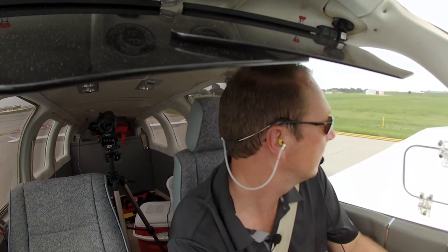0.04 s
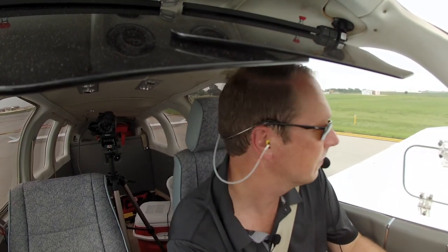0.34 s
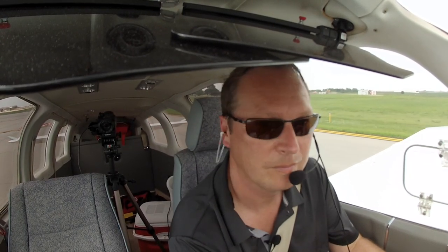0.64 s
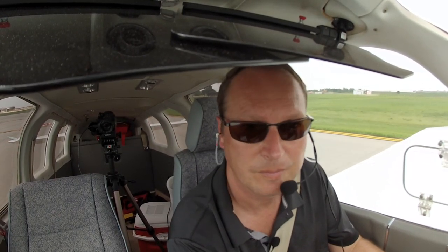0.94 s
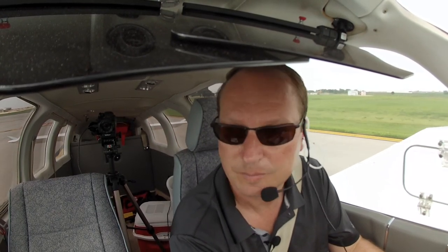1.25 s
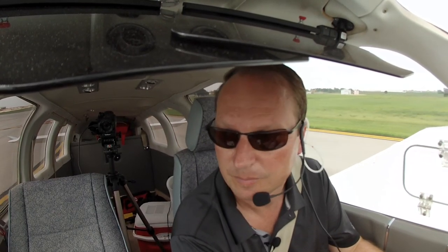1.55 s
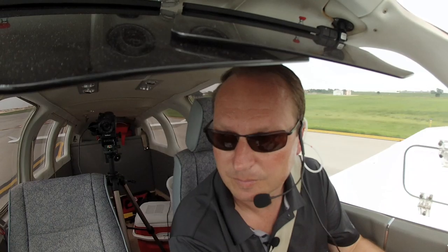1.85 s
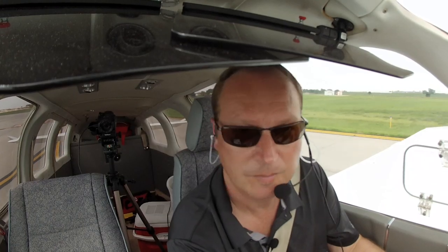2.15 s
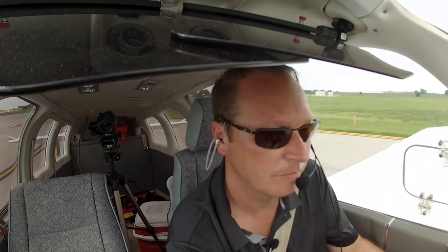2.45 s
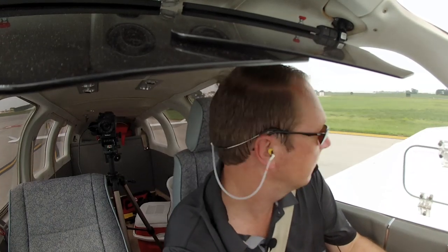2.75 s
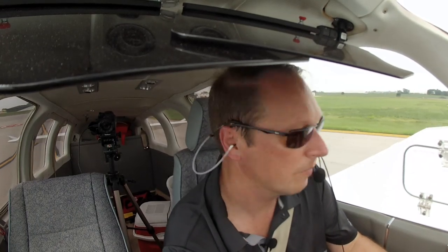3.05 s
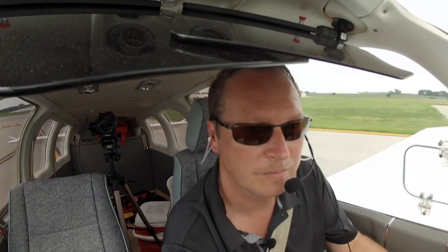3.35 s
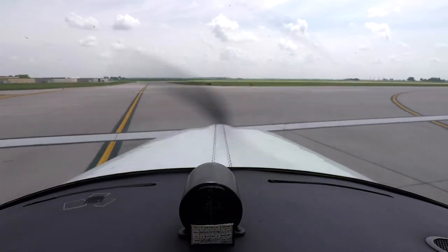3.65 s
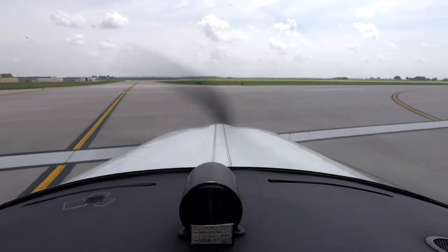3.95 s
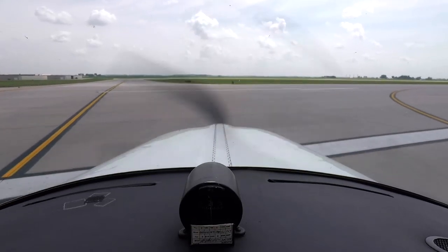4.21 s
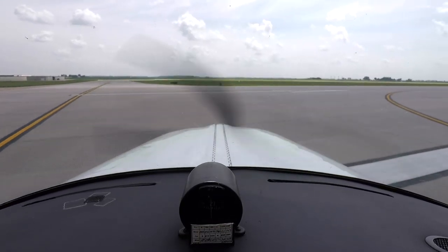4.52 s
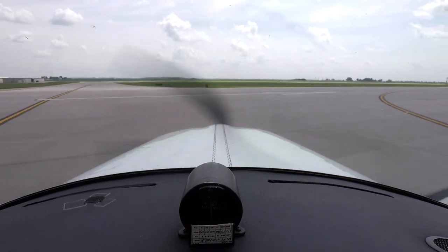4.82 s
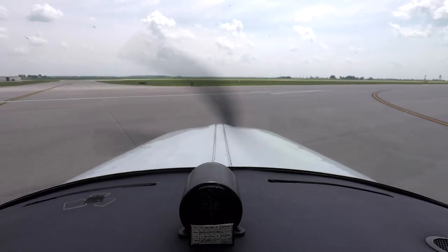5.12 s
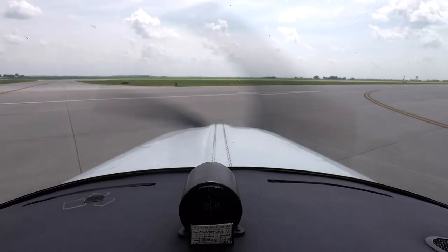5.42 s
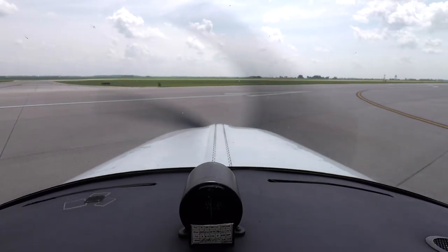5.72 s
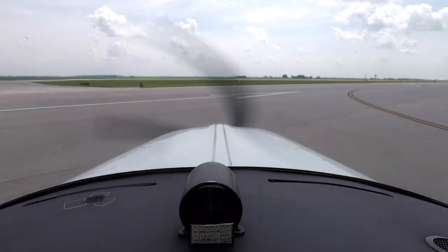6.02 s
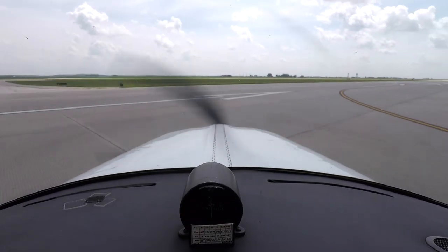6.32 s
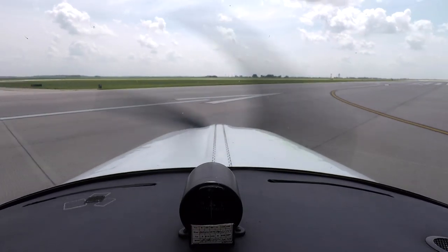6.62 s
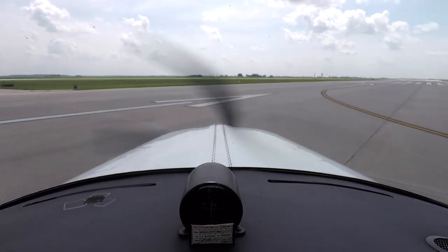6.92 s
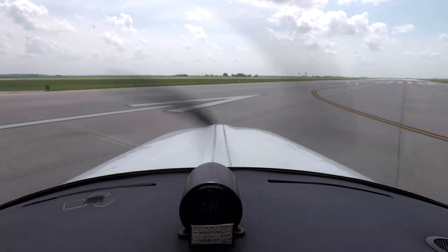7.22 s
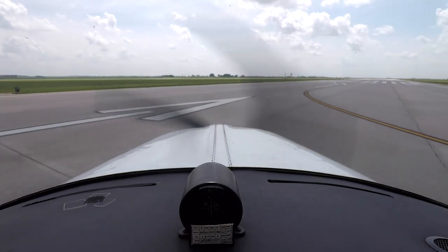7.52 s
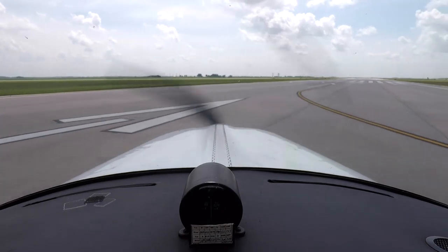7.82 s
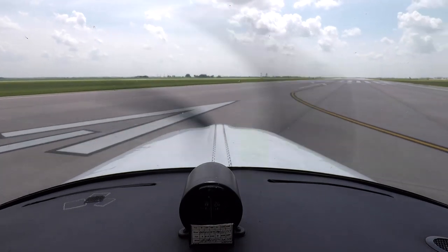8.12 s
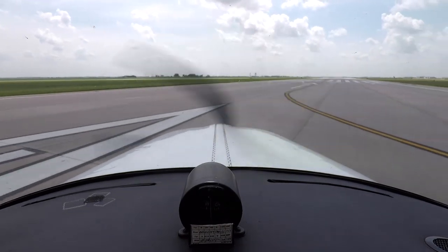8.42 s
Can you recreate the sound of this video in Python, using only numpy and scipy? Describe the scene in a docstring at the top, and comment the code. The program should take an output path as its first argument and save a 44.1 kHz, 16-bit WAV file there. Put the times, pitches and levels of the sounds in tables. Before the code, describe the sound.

A low piston engine drone fills the cabin of a small taxiing plane from the start, heard close, with airframe rumble and throbbing propeller wash. Its pitch creeps upward until about 4.5 seconds. Around 5 seconds it sinks to a lower, slightly softer, lumpy idle, while the deep rumble swells to a peak near 6.3 seconds. From about 7.5 seconds the engine picks up again, its hum swelling near 8 seconds and still rising in pitch at the end, around 8.5 seconds. A thin alternator whine follows the engine speed, above a faint air hiss and a very faint, steady electrical buzz. Throughout, a loose fitting chatters in light, irregular, ringing ticks, several a second, among tiny chirps and dry crackles. Short dull knocks sound in the cabin panels, a little stronger around 3.2, 3.6 and 7.6 seconds.

```python
"""An engine drone, heard in the cabin of a taxiing six-cylinder piston aircraft.
It sinks to a lumpy idle after five seconds, then picks up; a thin alternator whine follows the crank.
The airframe rumbles, propeller wash and exhaust beat on the cabin, the panel electrics sing faintly.
A loose fitting chatters and jolts thud in the panels, among small chirps and dry crackles."""
import sys
import numpy as np
from scipy import signal
from scipy.fft import rfft, irfft
from scipy.io import wavfile
from scipy.ndimage import uniform_filter1d

SR = 44100
rng = np.random.default_rng(int(sys.argv[2]) if len(sys.argv) > 2 else 0)


def dump_mix(stems):
    """Bounce the given channels to the path in sys.argv[1] as a 16-bit WAV at rate SR."""
    frames = np.atleast_2d(stems).T  # one column per channel
    limited = np.clip(frames, -1, 1)  # hard clip at full scale
    pcm = np.round(limited * 32767).astype(np.int16)
    wavfile.write(sys.argv[1], SR, pcm)


N = 373086
TIME = np.arange(N) / SR
HZ = np.fft.rfftfreq(N, 1 / SR)
FIRINGS_PER_TURN = 3
# brief level changes of wash and boom, mostly dips: t/s, change/dB
LULLS = [(.48, -4), (1.0, -8), (2.25, -2), (3.95, -4), (4.47, -7), (4.68, -7), (5.09, -3), (5.32, -6),
         (6.02, -11.5), (6.2, 2.5), (6.38, -11), (6.76, -4.5), (7.25, -6.5), (7.41, -13), (7.72, -3),
         (8.16, -9.5)]


def amp(db):
    """Decibels to gain."""
    return 10 ** (np.asarray(db) / 20)


def unit(x):
    """Scales to unit rms."""
    return x / np.sqrt(np.mean(x ** 2) + 1e-20)


def add(mix, s, sound):
    """Mixes a sound in at time s."""
    part = mix[max(round(s * SR), 0):][:len(sound)]
    part += sound[:len(part)]


def curve(table):
    """A (t/s, value) table at every sample."""
    return np.interp(TIME, *np.transpose(table))


def bumps(table, width_s):
    """One Gaussian per (t/s, height) row."""
    return sum(height * np.exp(-((TIME - s) / width_s) ** 2) for s, height in table)


def colour(x, spectrum):
    """Filters x by a (f/Hz, gain/dB) table; unit rms."""
    hz, db = np.transpose(spectrum)
    gain = amp(np.interp(np.log(HZ + 1), np.log(hz), db))
    return unit(irfft(rfft(x) * gain, N))


def drift(rate_hz):
    """Smooth random signal, about rate_hz new values a second; unit rms."""
    knots = rng.standard_normal(4000)
    count = int(np.clip(rate_hz * N / SR, 2, 3990)) + 2
    smooth = signal.resample_poly(knots[:count], up=8, down=1)
    return unit(np.interp(np.linspace(0, len(smooth) - 1, N), np.arange(len(smooth)), smooth))


def throttle_closure(crank_hz):
    """0 under power, 1 at idle; the throttle leads the crank's inertia."""
    lag_s, power_hz, span_hz = .19, 21.51, 1.86
    demand_hz = crank_hz + lag_s * uniform_filter1d(np.gradient(crank_hz) * SR, SR // 4)
    return np.clip((power_hz - demand_hz) / span_hz, 0, 1)


def cabin_gain(hz):
    """Cabin resonances lift whatever passes through them."""
    modes = [(225.3, 6.2, 12), (299.6, 7.3, 8.5), (456, 144, 13)]  # f/Hz, width/Hz, lift/dB
    return 1 + sum((amp(db) - 1) / (1 + (2 * (hz - centre) / width) ** 2) for centre, width, db in modes)


def engine_drone(turns, crank_hz, idle):
    """Three firings a turn give the main tone; unequal cylinders fill in the half orders."""
    octave = [(0, -26.5), (.3, -26.5), (.5, -30.5), (1.1, -29.5), (1.35, -26.5), (1.8, -29.5),
              (2.85, -28.5), (3.1, -37), (4.7, -34), (5.5, -39.5), (7.2, -38), (7.6, -31.5), (7.88, -21.5),
              (8.2, -33.5), (8.46, -30)]  # firing tone's octave: t/s, level/dB
    bed = [(1, -36), (5.5, -48), (9.5, -57), (12.5, -63), (17, -63), (21, -62.5), (26, -66), (31, -65.5),
           (36, -71.5), (41, -68)]  # weak orders: crank multiple, level/dB
    orders = [(1, -43, -37), (1.5, -41, -38), (2, -35.5, -36), (3.5, -41, -45), (4, -41, -39),
              (4.5, -39.5, -32.5), (5, -40, -50), (6.5, -47, -52), (7, -50, -46), (7.5, -41.5, -40.5),
              (8, -45.5, -53), (9, -46, -43), (10, -42.5, -37.5), (10.5, -42, -47), (11, -55, -45),
              (11.5, -47, -47), (12, -62, -45), (13, -53, -62), (13.5, -49.5, -49.5), (14, -56, -56),
              (14.5, -59, -52), (15, -55, -60), (16, -56, -68), (16.5, -57, -61), (19, -58, -66),
              (20.5, -51.5, -65), (21.5, -56.5, -66), (22.5, -56.5, -66), (23.5, -63, -59),
              (28.5, -57.5, -63), (30, -58, -67), (33, -59, -68), (41, -64, -65)]  # strong orders: crank multiple, power level/dB, idle level/dB
    taxi_hz, firing_db_per_hz, scatter_db = 23.6, .47, 3.5

    def tone(order, flutter):
        """One crank order; the burns vary more at idle."""
        unevenness = 1 + flutter * (1 + 3 * idle) * drift(9)
        return unevenness * np.sqrt(2) * np.sin(2 * np.pi * (order * turns + rng.random()))

    firing_db = -23.5 + firing_db_per_hz * (crank_hz - taxi_hz) - 3.5 * idle
    out = amp(firing_db) * tone(FIRINGS_PER_TURN, flutter=.03)
    out += amp(curve(octave)) * tone(2 * FIRINGS_PER_TURN, flutter=.08)
    strong = {order: levels for order, *levels in orders}
    for order in np.setdiff1d(np.arange(1, 42, .5), [FIRINGS_PER_TURN, 2 * FIRINGS_PER_TURN]):
        bed_db = np.interp(order, *np.transpose(bed)) + scatter_db * rng.standard_normal()
        power_db, idle_db = strong.get(order, (bed_db, bed_db - 3))
        gain = amp(power_db + (idle_db - power_db) * idle) * unit(cabin_gain(order * crank_hz))
        out += gain * tone(order, flutter=.09)
    return out


def airframe(idle, chug):
    """Wheels and engine mounts shake the cabin, which booms more at idle."""
    shake = [(0, -42), (.7, -38.5), (1.4, -39), (2.6, -33.5), (3.5, -34.5), (4.9, -30), (6.3, -24.5),
             (7.1, -32), (8.46, -36)]  # rumble envelope: t/s, relative level/dB
    rumble_spectrum = [(5, -21), (14, -5), (25, -6), (40, 17.5), (52, 11.5), (70, 7), (110, -34),
                       (300, -80)]  # f/Hz, gain/dB
    boom_spectrum = [(6, -21), (20, 1.5), (30, 9.5), (60, -7.5), (85, 7.5), (115, 4.5), (150, -1),
                     (190, -5), (240, -8), (280, -17), (500, -52), (2000, -80)]  # f/Hz, gain/dB
    rumble = amp(curve(shake) + 2) * colour(rng.standard_normal(N), rumble_spectrum)
    boom = colour(rng.standard_normal(N), boom_spectrum)
    boom = unit(irfft(rfft(boom) * cabin_gain(HZ) ** .19, N))
    boom_db = -27 + 2.5 * idle + 2 * chug + 1.25 * drift(7.8) + bumps(LULLS, width_s=.049)
    return rumble + amp(boom_db) * boom


def alternator_whine(turns, crank_hz):
    """Belted to the crank: trembles with the belt, brightens with speed."""
    harmonics = [-61.5, -65, -76]  # from the fundamental up, at top speed: level/dB
    cycles_per_turn, tilt_db_per_hz = 72, 1.1
    slip_turns = .0023 * drift(42)
    swell = amp(1.6 * drift(22))
    tilt_db = tilt_db_per_hz * (crank_hz - crank_hz.max())
    phase = 2 * np.pi * cycles_per_turn * (turns + slip_turns)
    return swell * sum(amp(db + (k - 1) * tilt_db) * np.sin(k * phase) for k, db in enumerate(harmonics, 1))


def exhaust_puffs(turns, idle):
    """Gain with one decaying puff per firing; strengths scatter more at idle."""
    decay_db, scatter_db = 3.5, 1.2 + .6 * idle
    firing, fraction = np.divmod(abs(turns) * FIRINGS_PER_TURN, 1)
    strength = rng.standard_normal(1000)[firing.astype(int)]
    return uniform_filter1d(amp(scatter_db * strength - decay_db * fraction), size=60)


def propeller_wash(turns, idle, chug):
    """Wash and exhaust beat on the cabin, throbbing with the uneven cylinders."""
    envelope = [(0, -42.5), (1.4, -42.5), (1.9, -43.5), (3.3, -42.5), (4.3, -42.5), (4.6, -44.5),
                (6.1, -43.5), (6.8, -43.5), (7.35, -44), (7.8, -41.5), (8.46, -42)]  # t/s, level/dB
    throbs = [(1, .06), (1.5, .12), (2, .11), (2.5, .08)]  # modulation: crank multiple, depth
    spectrum = [(100, -33), (230, -7), (300, 4), (370, -1.5), (470, 1), (540, -6), (700, -3.5), (770, -8.5),
                (900, -4.5), (1120, -11.5), (1260, -10.5), (1700, -21), (2600, -24), (5000, -34),
                (10000, -48)]  # f/Hz, gain/dB
    level_db = curve(envelope) + .73 * drift(6.2) + chug + bumps(LULLS, width_s=.025)
    puffs = exhaust_puffs(turns, idle)
    throb = 1 + sum(depth * np.cos(2 * np.pi * (k * turns + rng.random())) for k, depth in throbs)
    gusts = amp(.5 * drift(20))
    return amp(level_db) * colour(puffs * throb * gusts * rng.standard_normal(N), spectrum)


def air_hiss(turns, pressure, idle):
    """Air noise flutters with the cabin's pressure swings and once per turn."""
    spectrum = [(600, -24), (1800, 16.5), (3200, 16), (3700, 10.5), (5300, 11), (6100, 14), (7000, 9.5),
                (9000, 9), (13000, 7.5), (15000, 8.5), (16000, 5)]  # f/Hz, gain/dB
    flutter = (1 + .12 * unit(pressure) ** 2) * (1 + .07 * np.cos(2 * np.pi * turns))
    air = flutter * amp(.9 * drift(140)) * rng.standard_normal(N)
    return amp(-60 - .3 * idle) * colour(air, spectrum)


def electrics():
    """The panel's power converters switch in sharp edges: a faint, steady, high buzz."""
    combs = [(626.1, 2, 2, 1, -71), (626.1, 6, 11, 1, -81.5), (204.42, 19, 75, 2, -83.7)]  # f/Hz, first harmonic, last harmonic, step, relative level/dB
    out = np.zeros(N)
    for hz, first, last, step, db in combs:
        cycles = hz * TIME + rng.random()
        for k in range(first, last + 1, step):
            out += amp(db + 4.5) * (first / k) ** .5 * np.cos(2 * np.pi * k * cycles)
    return out


def loose_fitting():
    """Each knock rings, scrapes and rebounds softly; the close walls reflect the ring."""
    knocks = [(0.009, -46, -51), (0.141, -42.5, -48), (0.285, -46, -52), (0.792, -43.5, -45),
              (0.816, -51, -50), (0.833, -46, -54), (0.93, -44, -51), (0.949, -47, -51),
              (1.076, -42.5, -47), (1.099, -52, -55), (1.118, -52, -51), (1.253, -42, -47),
              (1.302, -50, -42.5), (1.387, -45, -45), (1.487, -47, -49), (1.741, -49, -61),
              (1.801, -46, -45), (1.86, -48, -49), (1.972, -45, -53), (2.057, -45, -50), (2.083, -49, -52),
              (2.108, -50, -53), (2.13, -57, -55), (2.154, -46, -59), (2.48, -46, -46), (2.562, -49, -54),
              (2.612, -46, -55), (2.699, -46, -49), (2.805, -50, -44), (2.853, -45, -46.5),
              (2.882, -52, -53), (2.919, -50, -54), (2.976, -45, -56), (2.997, -54, -64),
              (3.065, -44.5, -48), (3.084, -51, -58), (3.107, -50, -54), (3.156, -44, -49),
              (3.177, -47, -51), (3.252, -54, -61), (3.287, -46, -46), (3.333, -49, -46), (3.355, -49, -51),
              (3.418, -46, -53), (3.445, -49, -57), (3.529, -46, -45), (3.557, -42.5, -51),
              (3.591, -44.5, -51), (3.658, -49.5, -47), (3.74, -49, -47), (3.759, -53, -53),
              (3.827, -47, -47), (3.899, -45, -49), (3.976, -51, -57), (4.017, -48, -51), (4.077, -46, -55),
              (4.114, -45, -46), (4.156, -49, -49), (4.182, -47, -56), (4.321, -45, -46), (4.377, -49, -52),
              (4.479, -51, -57), (4.521, -48, -52), (4.551, -54, -56), (4.658, -47, -57), (4.677, -48, -54),
              (4.827, -46, -51), (4.858, -51, -55), (4.897, -49, -60), (4.939, -52, -46), (5.023, -46, -50),
              (5.042, -51, -51), (5.162, -46, -46), (5.227, -50, -54), (5.264, -49, -64), (5.289, -50, -58),
              (5.306, -48, -58), (5.337, -49, -60), (5.367, -44.5, -54), (5.416, -48, -44.5),
              (5.505, -46, -45.5), (5.558, -45, -51), (5.708, -45.5, -47.5), (5.739, -52, -64),
              (5.764, -46, -53), (5.798, -54, -60), (5.865, -43, -48), (6.259, -47, -54), (6.292, -49, -61),
              (6.314, -51, -58), (6.337, -46, -54), (6.484, -41.5, -48), (6.727, -47, -50),
              (6.891, -41, -47), (7.002, -44.5, -52), (7.037, -53, -57), (7.08, -47, -50),
              (7.138, -49, -57), (7.173, -46, -56), (7.258, -49.5, -54), (7.339, -49.5, -47),
              (7.467, -43, -54), (7.658, -41.5, -42), (7.685, -51, -58), (7.786, -43.5, -47),
              (7.816, -47, -53), (7.88, -45.5, -45), (7.936, -53, -49), (7.959, -47, -53),
              (8.018, -45, -53), (8.073, -42.5, -50), (8.104, -45.5, -50), (8.137, -59, -47),
              (8.268, -47.5, -50), (8.357, -46, -52), (8.387, -50, -56), (8.403, -50, -50)]  # t/s, relative ring level/dB, relative scrape level/dB
    modes = [(2050, -15, .035), (2240, -18, .035), (2500, -20, .03), (2740, -4.5, .04), (2870, 0, .02),
             (2990, -15, .04), (3190, -20, .04), (4690, -28, .045), (5080, -30, .035), (5930, -28, .04),
             (6150, -26, .045)]  # f/Hz, level/dB, t60/s
    reflections = [(.00094, 0), (.00133, -4), (.00205, -9), (.00308, -3), (.00569, 0), (.00693, -6),
                   (.00844, -8), (.01003, -9), (.01364, -10), (.01569, -8.5)]  # off windscreen, panel and walls: delay/s, level/dB
    grit_spectrum = [(500, -13), (1500, 4.5), (3000, 6.5), (4000, -10), (6200, -5), (9000, -11),
                     (15000, -16)]  # f/Hz, gain/dB
    rise_s, decay_s, buzz_decay_s = .0005, .004, .03
    rings, scrapes, t = np.zeros(N), np.zeros(N), np.arange(4000) / SR
    scrape = (1 - np.exp(-t / rise_s)) * (np.exp(-t / decay_s) + amp(-12.5) * np.exp(-t / buzz_decay_s))
    grains = rng.standard_normal(N) * amp(4 * rng.standard_normal(N // 16 + 1)).repeat(16)[:N]
    walls = np.zeros(len(t))
    for delay_s, db in [(.00074, 0)] + reflections:
        walls[round(delay_s * SR)] = amp(db)
    for s, ring_db, scrape_db in knocks:
        ring = np.zeros(len(t))
        for hz, db, t60_s in modes:
            detune, share = rng.standard_normal(2)  # the contact point varies
            envelope = amp(db + 2.5 * share - 60 * t / t60_s)
            ring += envelope * np.sin(2 * np.pi * hz * t * (1 + .004 * detune))
        ring = signal.fftconvolve(ring, walls)[:len(t)]
        ring *= amp(ring_db - 1) / ring[:300].std()
        add(rings, s, ring)
        rebound_s = rng.uniform(.003, .016)
        add(rings, s + rebound_s, amp(-12) * ring)
        add(scrapes, s, amp(scrape_db + 1) * scrape)
    return rings + scrapes * colour(grains, grit_spectrum)


def panel_jolts():
    """Each jolt is a short dull knock of the cabin panels."""
    jolts = [(.095, -36), (.333, -34), (.575, -33), (.6, -37), (.905, -36), (.952, -35), (1.113, -36),
             (1.271, -35), (1.419, -34), (1.534, -36), (1.822, -34), (2.192, -35), (2.304, -36),
             (2.371, -34), (2.536, -36), (2.625, -36), (2.676, -34), (2.716, -36), (2.988, -35), (3.1, -34),
             (3.152, -34), (3.189, -32), (3.575, -32), (3.636, -32), (3.907, -33), (4.027, -34),
             (4.207, -35), (4.294, -33), (4.392, -34), (4.74, -37), (4.881, -37), (4.971, -36),
             (5.049, -37), (5.161, -34), (5.491, -36), (5.558, -36), (5.654, -38), (5.864, -37),
             (5.898, -38), (6.099, -37), (6.475, -37), (6.508, -37), (6.547, -36), (6.699, -38),
             (6.877, -38), (6.918, -37), (7.085, -38), (7.12, -36), (7.345, -39), (7.611, -31),
             (7.65, -30.5), (7.796, -38), (7.884, -36), (8.064, -36), (8.108, -36), (8.247, -34)]  # t/s, relative level/dB
    # f/Hz, gain/dB
    spectrum = [(150, -8), (280, 7), (460, 4.5), (700, -2), (1100, -10), (1800, -20.5),
                (4000, -27.5), (10000, -36.5)]
    envelope = bumps([(s, amp(db - 2.7)) for s, db in jolts], width_s=.0095)
    return envelope * colour(rng.standard_normal(N), spectrum)


def ticks_and_crackle():
    """Narrow chirps and dry crackles, many like a microphone overloading; wider bands are shorter."""
    ticks = [(.107, -56, 5000, 7000), (.192, -56, 6100, 1500), (.462, -59, 10500, 3000),
             (.605, -53.5, 5000, 7000), (.779, -57, 6000, 7000), (.963, -55, 4500, 6000),
             (1.667, -52, 3900, 650), (1.714, -52, 4500, 6000), (2.217, -56, 6000, 7000),
             (2.299, -58, 3000, 6000), (2.546, -57, 6000, 7000), (2.627, -57, 5000, 7000),
             (2.725, -55, 5000, 7000), (2.991, -60, 5000, 7000), (3.127, -56, 4500, 6000),
             (3.215, -58, 4000, 6000), (3.393, -53, 4000, 6000), (3.577, -58, 4500, 6000),
             (3.801, -55, 4800, 3000), (3.916, -54, 5000, 7000), (4.035, -52, 7500, 5000),
             (4.128, -52, 6000, 7000), (4.212, -58, 6000, 7000), (4.3, -57, 5000, 7000),
             (4.346, -49, 6200, 1500), (4.425, -51, 4300, 2000), (4.627, -56, 3800, 6000),
             (4.742, -57, 5000, 7000), (4.847, -57, 6000, 7000), (4.972, -57, 5000, 7000),
             (5.054, -53, 3870, 5000), (5.245, -53, 5000, 7000), (5.44, -57, 6000, 7000),
             (5.79, -55, 5000, 7000), (5.927, -54, 6000, 7000), (6.248, -56, 5000, 7000),
             (6.362, -54, 5000, 7000), (6.544, -54, 6200, 3000), (6.567, -53, 5000, 7000),
             (6.711, -55, 6000, 7000), (6.745, -54, 5000, 7000), (6.932, -52, 5000, 7000),
             (7.127, -50.5, 3950, 900), (7.223, -57, 4500, 6000), (7.371, -51, 3700, 1500),
             (7.675, -55, 5000, 7000), (8.318, -55, 5000, 7000), (8.372, -55, 6000, 7000)]  # t/s, relative level/dB, f/Hz, width/Hz
    chirp_rise_s, chirp_width_hz = .0018, 2200
    out, t = np.zeros(N), np.arange(2000) / SR
    for s, db, hz, width_hz in ticks:
        band = signal.iirpeak(hz, hz / width_hz, fs=SR)
        burst = unit(signal.lfilter(*band, rng.standard_normal(len(t))))
        shortness = np.clip(width_hz / chirp_width_hz, 1, 3)
        age = t * shortness / chirp_rise_s
        envelope = np.sqrt(shortness) * age * np.exp(1 - age)
        add(out, s - chirp_rise_s / 2, amp(db) * envelope * burst)
    return out


def scene():
    """The crank drives engine, alternator and propeller; uneven burns make the cabin chug at idle."""
    crank_speed = [(0, 20.75), (.4, 20.86), (.9, 21.2), (2.1, 21.88), (2.7, 21.97), (3.2, 22.22),
                   (4.55, 22.44), (4.8, 21.98), (5.35, 20.35), (5.75, 19.84), (6.3, 19.57), (7.15, 19.47),
                   (7.55, 19.88), (8.1, 20.92), (8.46, 21.78)]  # t/s, rotation rate/Hz
    crank_hz = curve(crank_speed)
    idle = throttle_closure(crank_hz)
    chug = idle * drift(26)
    jitter_turns = .0008 * (1 + 2 * idle) * drift(20)
    turns = np.cumsum(crank_hz) / SR + jitter_turns
    pressure = engine_drone(turns, crank_hz, idle) + airframe(idle, chug)
    mix = pressure + alternator_whine(turns, crank_hz) + propeller_wash(turns, idle, chug)
    mix += air_hiss(turns, pressure, idle) + electrics()
    return (mix + panel_jolts() + ticks_and_crackle() + loose_fitting())[None]


def record(dry):
    """Rounds off the largest peaks, dulls the very top and limits the band."""
    ceiling, dull_hz, edge_hz = .33, 15700, 15600
    soft = dry / (1 + (dry / ceiling) ** 8) ** (1 / 8)
    dull = signal.firwin(21, dull_hz, fs=SR)
    edge = signal.firwin(511, edge_hz, window=("kaiser", 9), fs=SR)
    taps = np.convolve(dull, edge)
    padded = np.pad(soft[0], len(taps) // 2, "reflect", reflect_type="odd")
    return signal.oaconvolve(padded, taps, "valid")[None]


dry = scene()
out = record(dry)
dump_mix(out)
```